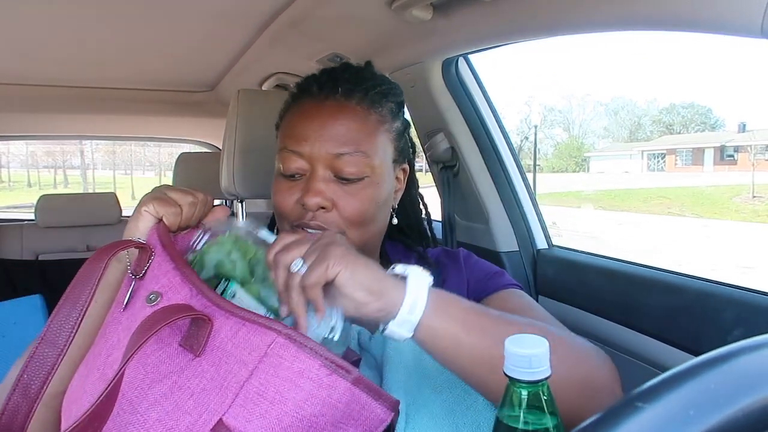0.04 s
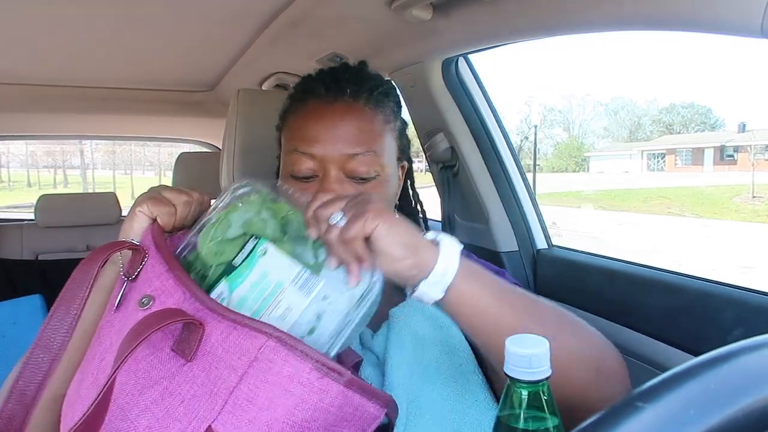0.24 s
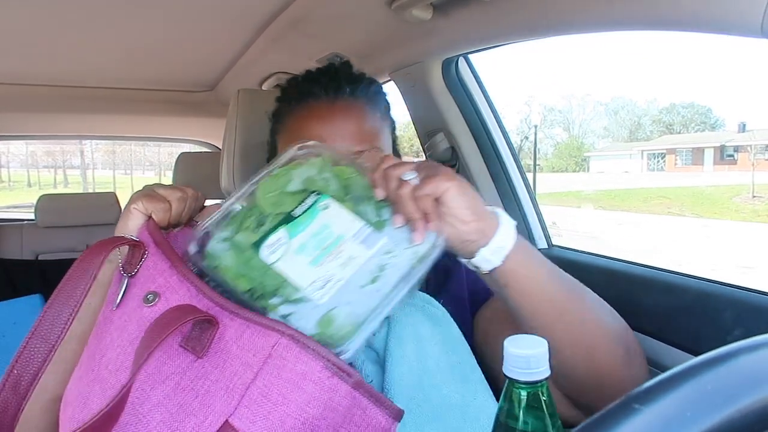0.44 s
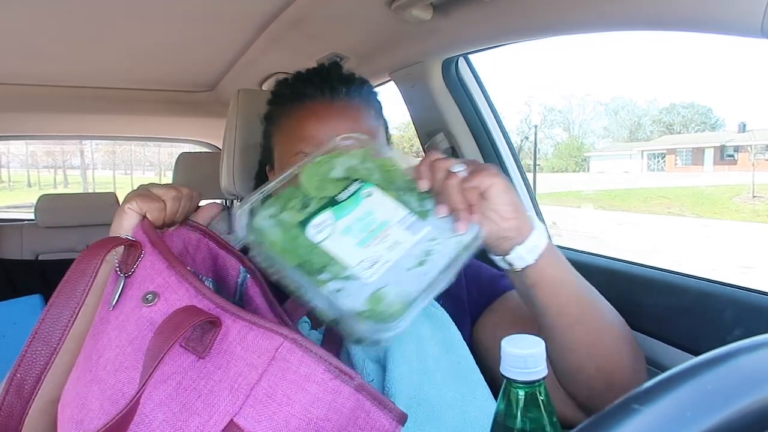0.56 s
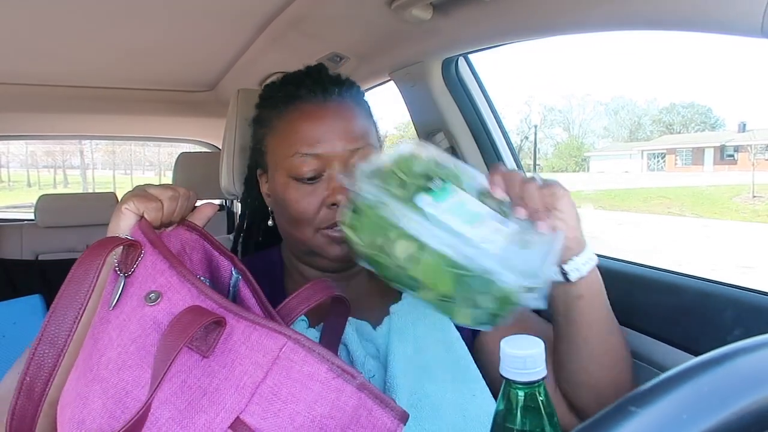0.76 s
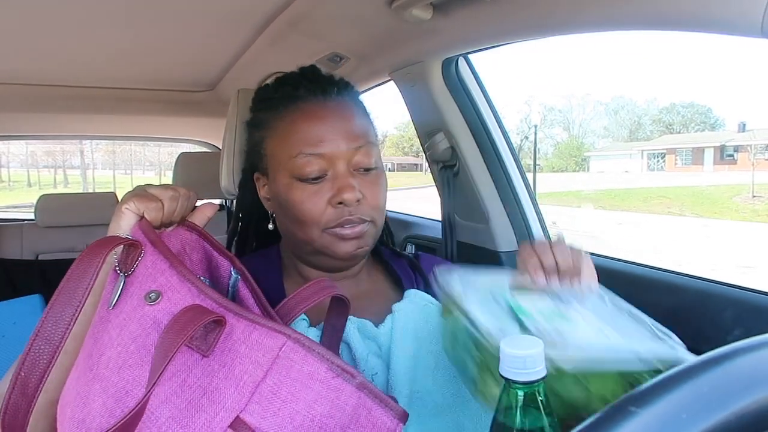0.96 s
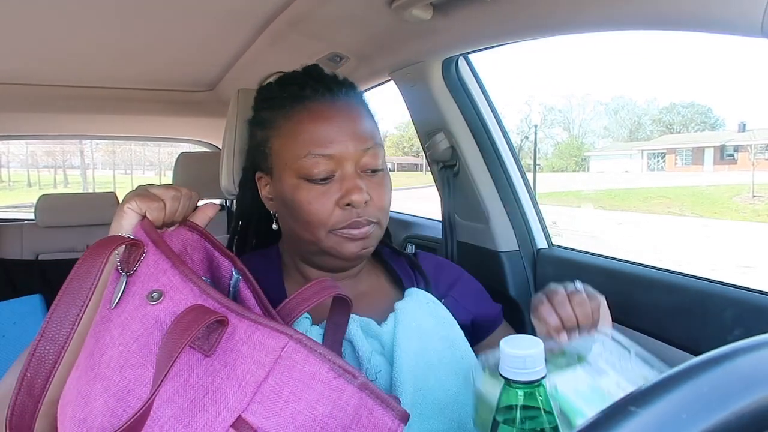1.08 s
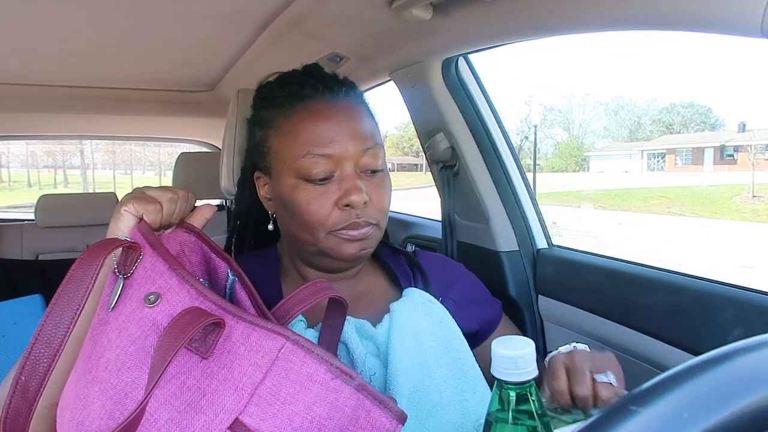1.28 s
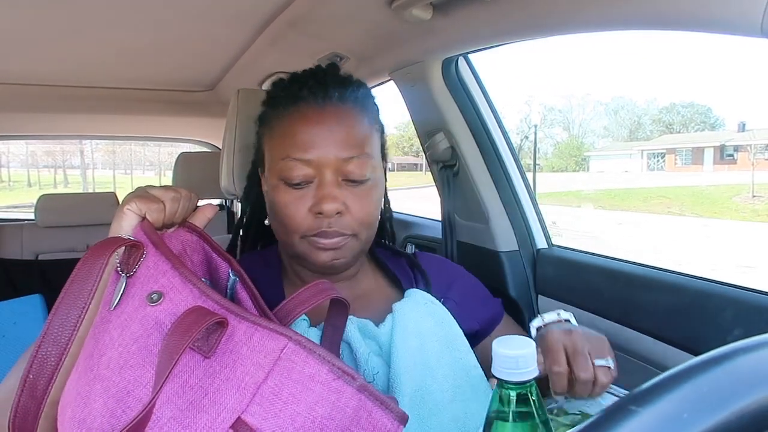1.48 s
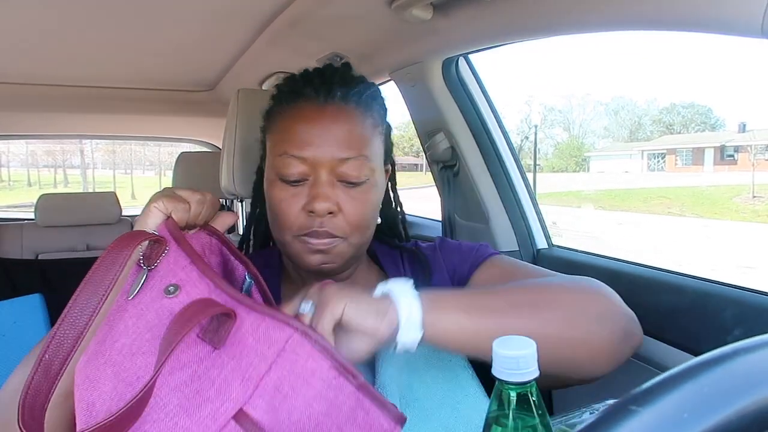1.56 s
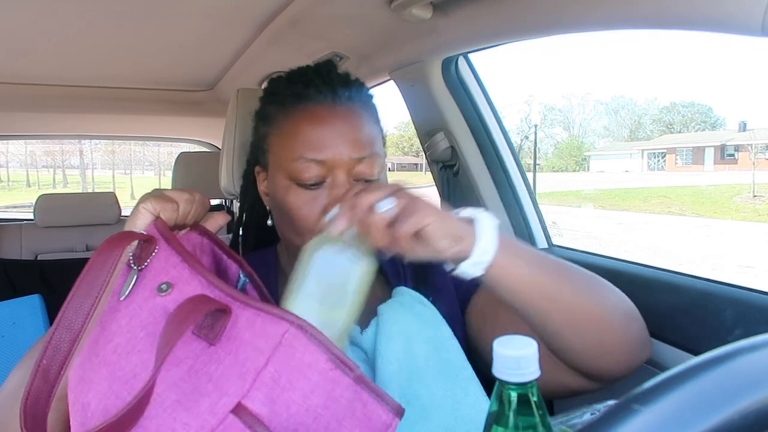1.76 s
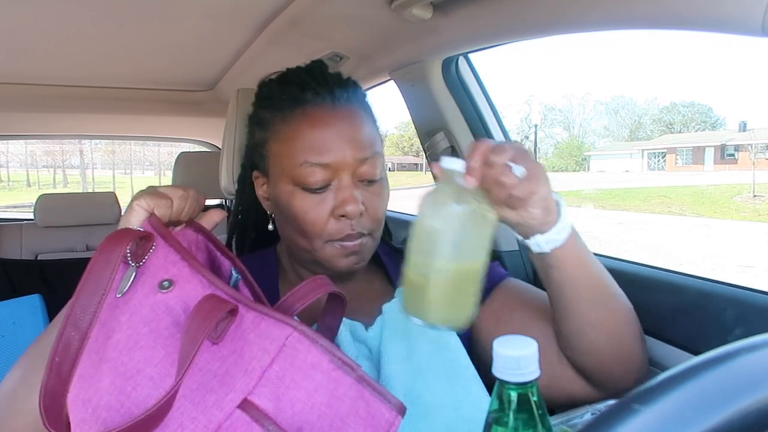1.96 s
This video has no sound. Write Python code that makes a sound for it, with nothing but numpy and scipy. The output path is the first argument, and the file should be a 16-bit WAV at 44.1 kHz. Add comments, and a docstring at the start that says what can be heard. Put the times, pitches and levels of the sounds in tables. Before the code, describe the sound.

A thin plastic salad box crackles and snaps loudly as it is pulled from a soft bag

```python
"""Inside an idling car, a thin plastic salad box is dragged out of a soft bag: its walls snap and crinkle.
It brushes past, bumps something soft and is set down with a clatter; then an arm rustles back into the bag.
Snaps and crinkles are clicks with short noise echoes from the padded cabin, plus the ringing of the box.
Chirps are rough fading tones; squeaks, cloth and rumble are shaped noise; bumps ring low; the idle hums."""
import sys
import numpy as np
from scipy import signal
from scipy.fft import rfft, irfft, next_fast_len
from scipy.io import wavfile
from scipy.ndimage import map_coordinates

SR = 44100
rng = np.random.default_rng(int(sys.argv[2]) if len(sys.argv) > 2 else 0)


def store_pcm(level_fs):
    """Save levels as 16-bit WAV."""
    pcm = np.round(np.clip(level_fs, -1, 1) * 32767).astype(np.int16)
    wavfile.write(sys.argv[1], SR, np.atleast_2d(pcm).T)


N = 89214  # length in samples, about 2 s

# Likeness of left and right noise: f/Hz, correlation (1 = identical)
EAR_LIKENESS = [(100, 1), (600, .99), (1400, .96), (2800, .85), (5500, .55), (12000, .65)]

# Steady tones of engine and fan: f/Hz, middle level/dB
HUM_TONES = [(45.5, -46), (92, -44), (117.5, -46)]
# Tone colour of the cabin rumble: f/Hz, relative level/dB per Hz
RUMBLE_COLOUR = [(15, 6), (28, -6.5), (45, 1.5), (65, -7), (110, -11.5), (200, -6.5), (330, -14.5),
                 (520, -13.5), (750, -25), (1200, -29.5), (2500, -46), (8000, -49)]
RUMBLE_DB = -33

# Loudness of the rubbing cloth: t/s, level/dB
CLOTH_LEVEL = [(0, -43), (.68, -50), (.76, -56.5), (.85, -54.5), (.9, -48.5), (1.01, -53.5), (1.2, -61),
               (1.5, -55), (1.584, -52), (1.609, -42.5), (1.7, -45.5), (1.85, -49), (2.02, -55)]
# Tone colour of the cloth: f/Hz, relative level/dB per Hz
CLOTH_COLOUR = [(530, -34), (900, 1.5), (1360, -17.5), (1550, -1.5), (1890, -9), (2150, -6.5), (4960, -11),
                (12600, -27), (15000, -56)]

# Resonances of the box's walls: f/Hz, relative level/dB, t60/s (time to fall 60 dB)
BOX_MODES = [(530.4, 7, 0.052), (762.2, -0.5, 0.055), (1090, -3, 0.06), (1418, -8.5, 0.12),
             (1800, 2, 0.063), (2078, -1.5, 0.019), (2551, 2.5, 0.023), (3040, -2, 0.11),
             (3143, -0.5, 0.033), (3634, -2, 0.062), (4207, -9, 0.076), (5064, -9, 0.13), (5400, -6, 0.034),
             (6230, -8, 0.14)]

# The box scraping along the bag: peak t/s, rise/s, fall/s, level/dB, tilt/dB per octave
CRINKLE_EVENTS = [(.01, 0.11, 0.2, -34, -2), (.17, 0.17, 0.3, -34.5, 0.5), (.27, 0.057, 0.054, -33.5, -3),
                  (.355, 0.065, 0.12, -32.5, 1.5), (0.433, 0.066, 0.055, -19, 4.5),
                  (.52, 0.11, 0.16, -42.5, 3.5), (0.643, 0.1, 0.081, -26.5, 5),
                  (1.06, 0.063, 0.21, -38.5, 0.5), (1.15, 0.064, 0.032, -35.5, 1),
                  (1.337, 0.097, 0.056, -22, 0.5), (1.443, 0.058, 0.049, -25, 1.5),
                  (1.62, 0.13, .2, -41.5, 2)]
# Tone colour of the crinkles before their tilt: f/Hz, relative level/dB per Hz
CRINKLE_COLOUR = [(100, -37), (300, -1.5), (550, 0.5), (1100, -2.5), (2000, -10.5), (3300, -16),
                  (6000, -24.5), (12500, -35.5), (15000, -22)]
GRAINS_PER_S, GRAIN_SPREAD_DB = 700, 2.5
CRINKLE_WALL_DEPTH, SNAP_WALL_DEPTH = 0.56, 1.09  # how strongly the walls colour each sound

# Snaps and knocks of the box: t/s, then level/dB of thud, hollow ring, crack and tick
# (before the band or ring gain), base echo t60/s, centre of the ring f/Hz
SNAP_EVENTS = [(0.029, -28.5, -53, -28.5, -39, 0.04, 1100), (0.0773, -25, -22, -18, -28, 0.035, 1090),
               (0.2353, -34, -19.5, -23.5, -46.5, 0.081, 655),
               (0.3148, -24.5, -32, -27.5, -40.5, 0.15, 710), (.3295, -31, -30, -34, -40, 0.052, 710),
               (.3325, -20.5, -12, -17.5, -36.5, 0.051, 790), (0.387, -39, -28, -30, -48, 0.14, 1020),
               (0.3984, -45, -21.5, -23, -31, 0.13, 950), (.4229, -40, -32, -14.5, -19, 0.085, 1800),
               (.4325, -23, -31, -14, -20, 0.074, 1500), (0.4394, -54, -13, -16, -26.5, 0.096, 920),
               (.4475, -23.5, -16, -38, -32, 0.15, 520), (.4579, -23, -16, -11, -28, 0.067, 1210),
               (.4660, -25, -23.5, -23.5, -45, 0.037, 1200), (.5100, -58, -44, -33, -47, 0.054, 2850),
               (0.5443, -28, -21, -24.5, -34.5, .06, 796), (0.5938, -35, -22.5, -27, -37, 0.18, 750),
               (.6152, -45, -38, -28, -27.5, 0.017, 1100), (.6220, -23.5, -24.5, -18, -30, 0.095, 1140),
               (0.6454, -20, -33, -18, -24.5, 0.044, 800), (.6515, -25, -19, -37, -50, 0.07, 1090),
               (0.6579, -25, -27.5, -23.5, -33.5, .055, 620), (.6652, -33, -25, -41, -30, 0.017, 690),
               (.6730, -44, -27.5, -27, -33.5, 0.046, 500), (0.6855, -48, -32, -27, -40, .06, 604),
               (0.872, -56, -42.5, -40, -41, 0.065, 1420), (.9765, -40, -33.5, -50, -70, 0.02, 1000),
               (1.176, -33.5, -39, -57, -69, 0.025, 1050), (1.25, -25, -20, -22, -34.5, 0.13, 840),
               (1.280, -20.5, -14, -26.5, -61, .06, 525), (1.303, -38, -39, -35, -60, 0.049, 557),
               (1.3358, -35, -27, -20.5, -45, 0.052, 970), (1.344, -23, -24.5, -32, -53, .05, 990),
               (1.3831, -22, -27, -25.5, -37, .05, 1050), (1.39, -36, -20.5, -29, -40, 0.09, 1080),
               (1.4, -21.5, -28, -40, -54, 0.075, 560), (1.417, -18.5, -23, -42, -42, 0.059, 500),
               (1.440, -48, -24.5, -30, -35, 0.099, 585), (1.449, -37, -25, -36, -38, 0.077, 1390),
               (1.542, -28.5, -31, -40.5, -69, 0.073, 1100), (1.568, -33, -36, -55, -75, 0.066, 1030),
               (1.607, -47, -43, -36, -46.5, 0.04, 1010), (1.634, -43, -51, -39, -48, 0.077, 604),
               (1.747, -35.5, -35.5, -40, -49.5, .08, 554)]
# Bands of thud, ring, crack and tick: low f/Hz, high f/Hz (at most TOP_HZ), gain/dB,
# direct click over reflections (amplitude ratio), share of the snap's t60 (factor)
SNAP_BANDS = [(146, 572, -1.5, 0.32, 1.12), (447, 1464, -4, 0.47, 1.07), (1500, 4460, -5.5, 0.37, 1.1),
              (5050, 22000, 0.5, 0.43, 1.03)]
RING_GAIN_DB, RING_ATTACK_S = -1.5, 0.00065
RING_FOCUS_DB = 13.5  # loss per octave away from the centre of the ring

# Stick-slip chirps of the thin plastic: t/s, middle pitch f/Hz, level/dB
CHIRP_EVENTS = [(0.033, 2975, -36.5), (.078, 3280, -28.5), (0.235, 2855, -32.5), (0.3142, 3170, -37),
                (.4000, 6230, -34), (0.4217, 2980, -19), (0.4242, 1870, -21), (0.433, 3350, -24),
                (0.512, 2870, -39.5), (.955, 2256, -40.5), (1.050, 2230, -46), (1.252, 2020, -26),
                (1.439, 4570, -36.5)]
CHIRP_RISE_S, CHIRP_T60_S = 0.0011, 0.051
CHIRP_ROUGHNESS = 0.078  # random phase step at each sample, in radians

# Dull shifting of the load: peak t/s, rise/s, fall/s, level/dB
SHIFT_EVENTS = [(.335, 0.025, .06, -27), (.455, 0.086, .05, -35.5), (0.679, 0.067, 0.088, -35),
                (1.155, 0.053, 0.037, -29.5), (1.255, 0.019, 0.11, -26.5), (1.42, .1, 0.11, -26.5)]
# Tone colour of the shifting: f/Hz, relative level/dB per Hz
SHIFT_COLOUR = [(20, -4), (40, -3), (110, 11.5), (180, 1), (300, 1), (800, -82)]
# Soft bumps: t/s, level/dB before the soft attack
BUMP_EVENTS = [(1.1373, -19.5), (1.157, -28)]
# Resonances of a bump, before random scatter: f/Hz, relative level/dB, t60/s
BUMP_RESONANCES = [(160, -10, 0.12), (237, 0.5, 0.077), (284.5, -1.5, 0.048)]

# Plastic slipping over cloth: peak t/s, level/dB, rise/s, fall/s
SQUEAK_EVENTS = [(.885, -46, 0.015, 0.037), (.94, -41, 0.075, 0.051), (.958, -29.5, .012, 0.02),
                 (1.051, -34.5, 0.0034, 0.016), (1.062, -45, .004, .015), (1.072, -40, .004, .015),
                 (1.084, -42.5, .004, 0.018), (1.145, -45.5, 0.021, 0.053)]
# Tone colour of the squeaks: f/Hz, relative level/dB per Hz
SQUEAK_COLOUR = [(800, -13.5), (1800, -16), (2250, 3), (2600, -10), (3200, -17), (6000, -18.5),
                 (10000, -24), (14000, -61)]
SQUEAK_FLUTTER_DB, SLIPS_PER_S = 3, 400

# Gain of the box's top treble over time: dull at the start, near 0.9 s and around 1.28 s,
# open between: t/s, level/dB
TOP_TREBLE_GAIN = [(0, -10.5), (.4, -1.5), (.7, -0.5), (.9, -9), (1.251, 1), (1.28, -23), (1.46, -8),
                   (1.62, 0.5)]
TOP_TREBLE_EDGE_HZ = 8430
PAN_DB = 0.23  # the box is this much louder on the right and softer on the left
# Phase by which left trails right: f/Hz, lag/radians
LEFT_PHASE_LAG = [(500, 0), (2800, .12), (4200, .7), (5800, 1.3), (8300, 2.2), (11000, 2.5), (15000, 2.6)]
# Frequency response of the recorder, its top treble rolled off: f/Hz, level/dB
RECORDER_RESPONSE = [(20, -4.5), (30, 1), (10000, -0.5), (12800, -6), (14000, -20), (15800, -29)]
TOP_HZ = 15800  # nothing is kept from here up


def amp(db):
    """Turn decibels into a gain."""
    return 10 ** (np.asarray(db) / 20)


def unit(x):
    """Scale to an rms (average strength) of 1."""
    return x / np.sqrt(np.mean(x ** 2) + 1e-20)


def blow(x):
    """Scale a short sound to the energy of 10 ms at rms 1."""
    return x / np.sqrt(np.mean(x ** 2) * x.shape[-1] / (SR / 100))


def along(points, hz):
    """Read a curve of (f/Hz, value) points on a log frequency axis."""
    f, v = np.transpose(points)
    return np.interp(np.log(hz + 1), np.log(f + 1), v)


def over_time(points):
    """Draw straight lines between (t/s, value) points."""
    return np.interp(np.arange(N) / SR, *np.transpose(points))


def wobble(rate):
    """Make a smooth random curve through rate random points a second."""
    knots = rng.standard_normal(int(N * rate / SR) + 4)
    return map_coordinates(knots, [np.arange(N) * rate / SR])


def filtered(x, response):
    """Multiply the spectrum of x by a response that depends on frequency."""
    n = x.shape[-1]
    m = next_fast_len(n + 4096)  # spare room for the filter's tail
    return irfft(rfft(x, m) * response(np.fft.rfftfreq(m, 1 / SR)), m)[..., :n]


def noise(size):
    """White stereo noise, most alike in both ears in the bass."""
    def mid_side_gains(hz):
        turn = np.arccos(np.clip(along(EAR_LIKENESS, hz), -1, 1)) / 2
        return np.array([np.cos(turn), np.sin(turn)])

    mid, side = filtered(rng.standard_normal((2, size)), mid_side_gains)
    return np.array([mid + side, mid - side])


def rush(spectrum):
    """Coloured stereo noise of rms 1."""
    return unit(filtered(noise(N), lambda hz: amp(along(spectrum, hz))))


def fade(t, t60):
    """Exponential decay that falls 60 dB in t60 seconds."""
    return np.exp(-np.log(1000) * t / t60)


def attack(t, rise):
    """A soft start that rises quickly at first, then levels off."""
    return 1 - np.exp(-t / rise)


def swell(peak, rise, fall):
    """A gain that climbs 20 dB in the rise time and drops 20 dB in the fall time."""
    t = np.arange(N) / SR - peak
    return amp(-20 * np.maximum(-t / rise, t / fall))


def ring(modes, t, scatter_db):
    """Add fading sine tones, tuned a little differently at each strike."""
    total = 0
    for k, (hz, db, t60) in enumerate(modes):
        gain = amp(db + scatter_db * rng.normal())
        pitch = hz * (1 + 0.015 * rng.normal())
        sign = (-1) ** k  # every other mode is flipped
        total = total + sign * gain * fade(t, t60) * np.sin(2 * np.pi * pitch * t)
    return blow(total)


def add(track, s, x):
    """Mix x into the track at time s, cutting it off at the end."""
    part = track[:, round(s * SR):][:, :x.shape[-1]]
    part += x[..., :part.shape[1]]


def walls(hz, depth):
    """The box's resonances boost nearby frequencies; quicker fading makes a broader peak."""
    peaks = sum(amp(db / 2) / (1 + 1j * (hz - f) * t60 * np.pi / np.log(1000)) for f, db, t60 in BOX_MODES)
    return 1 + depth * peaks


def idle():
    """The car's low noise rumble and tones that drift slightly in level and phase."""
    t = np.arange(N) / SR
    hum = 0
    for hz, db in HUM_TONES:
        level = amp(db + 1.0 * wobble(5.6)) * np.sqrt(2)  # root 2 gives a sine an rms of 1
        hum = hum + level * np.sin(2 * np.pi * hz * t + 0.43 * wobble(4.9))
    return hum + amp(RUMBLE_DB) * rush(RUMBLE_COLOUR)


def cloth():
    """An arm and the bag's fabric rub unevenly: noise with a flickering level."""
    return amp(over_time(CLOTH_LEVEL) + 1.5 * wobble(60)) * rush(CLOTH_COLOUR)


def crinkles():
    """Showers of tiny buckles, coloured by the box's walls and smeared by the cabin."""
    out, t = np.zeros((2, N)), np.arange(SR // 12) / SR
    for peak, rise, fall, db, tilt_db in CRINKLE_EVENTS:
        buckles = (rng.random(N) < GRAINS_PER_S / SR) * rng.choice([-1, 1], N)
        strength = amp(GRAIN_SPREAD_DB * np.minimum(rng.exponential(size=N), 4))
        echo = noise(len(t)) * fade(t, t60=0.027)
        echo /= np.linalg.norm(echo[0])
        echo[:, 0] += 1  # the direct click
        shower = signal.fftconvolve((buckles * strength)[None], echo, axes=1)[:, :N]

        def colour(hz):
            tone = amp(along(CRINKLE_COLOUR, hz) + tilt_db * np.log2(hz + 1))
            return walls(hz, CRINKLE_WALL_DEPTH) * tone

        out += amp(db) * swell(peak, rise, fall) * unit(filtered(shower, colour))
    return out


def snaps():
    """A wall pops: a click, its dense reflections in the cabin, and the hollow ring of the box."""
    out, t = np.zeros((2, N)), np.arange(SR // 6) / SR
    filters = [signal.butter(3, [lo, min(hi, TOP_HZ)], "band", fs=SR, output="sos")
               for lo, hi, *_ in SNAP_BANDS]
    colour = walls(np.fft.rfftfreq(len(t), 1 / SR), SNAP_WALL_DEPTH)
    for s, thud_db, ring_db, crack_db, tick_db, t60, centre_hz in SNAP_EVENTS:
        reflections = noise(len(t))
        levels = (thud_db, ring_db, crack_db, tick_db)
        for db, band, (_, _, gain_db, direct, share) in zip(levels, filters, SNAP_BANDS):
            echo = reflections * fade(t, t60 * share)
            click = echo / np.linalg.norm(echo[0]) + direct * (t == 0)
            coloured = irfft(rfft(signal.sosfilt(band, click)) * colour, len(t))
            add(out, s, amp(db + gain_db) * blow(coloured))
        # modes far from the centre of the ring are weaker
        modes = [(hz, db - RING_FOCUS_DB * abs(np.log2(hz / centre_hz)), life) for hz, db, life in BOX_MODES]
        hollow = ring(modes, t, scatter_db=0.0) * attack(t, RING_ATTACK_S)
        add(out, s, amp(ring_db + RING_GAIN_DB) * hollow)
    return out


def chirps():
    """The plastic catches and slips briefly at one rough pitch: a tone with randomly drifting phase."""
    out, t = np.zeros((2, N)), np.arange(SR // 10) / SR
    for s, hz, db in CHIRP_EVENTS:
        phase = 2 * np.pi * hz * t + CHIRP_ROUGHNESS * np.cumsum(rng.standard_normal(len(t)))
        tone = np.sin(phase) * fade(t, CHIRP_T60_S) * attack(t, CHIRP_RISE_S)
        add(out, s, amp(db) * blow(tone))
    return out


def bumps():
    """The load shifts as swells of dull noise; soft knocks ring a few low modes."""
    shifting = sum(amp(db) * swell(s, rise, fall) for s, rise, fall, db in SHIFT_EVENTS)
    out = rush(SHIFT_COLOUR) * shifting
    t = np.arange(SR // 5) / SR
    for s, db in BUMP_EVENTS:
        knock = ring(BUMP_RESONANCES, t, scatter_db=3) * attack(t, 0.0025)
        add(out, s, -amp(db) * knock)
    return out


def squeaks():
    """Plastic slips unevenly over cloth: fluttering noise, strongest in one narrow band."""
    slips = unit(amp(SQUEAK_FLUTTER_DB * wobble(SLIPS_PER_S)))
    level = sum(amp(db) * swell(s, rise, fall) for s, db, rise, fall in SQUEAK_EVENTS)
    return slips * rush(SQUEAK_COLOUR) * level


def vary_top_treble(x):
    """Split off the box's top treble and let its level rise and fall."""
    dull = filtered(x, lambda hz: 1 / (1 + (hz / TOP_TREBLE_EDGE_HZ) ** 20))
    return dull + (x - dull) * amp(over_time(TOP_TREBLE_GAIN))


def scene():
    """Mix all sources; the treble reaches the left slightly after the right."""
    left_right = np.array([[-1], [1]])
    box = vary_top_treble(snaps() + crinkles() + squeaks() + chirps()) * amp(PAN_DB * left_right)
    both = box + bumps() + cloth() + idle()
    return filtered(both, lambda hz: np.exp(0.5j * along(LEFT_PHASE_LAG, hz) * left_right))


def record(dry):
    """The recorder's frequency response: the top treble is rolled off, nothing is kept from TOP_HZ up."""
    return filtered(dry, lambda hz: amp(along(RECORDER_RESPONSE, hz)) * (hz < TOP_HZ))


dry = scene()
out = record(dry)
store_pcm(out)
```